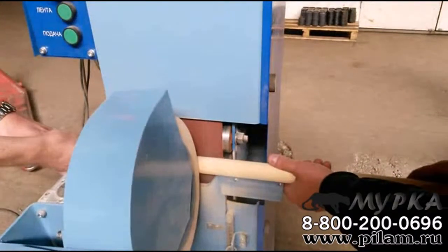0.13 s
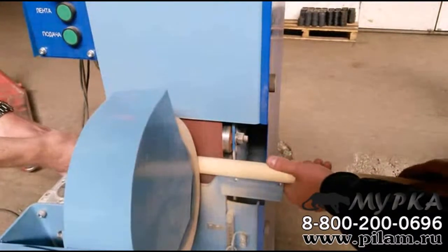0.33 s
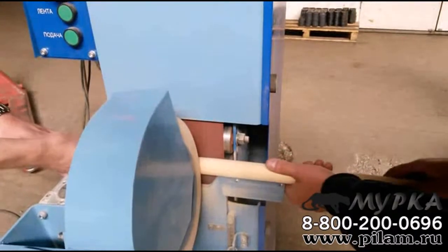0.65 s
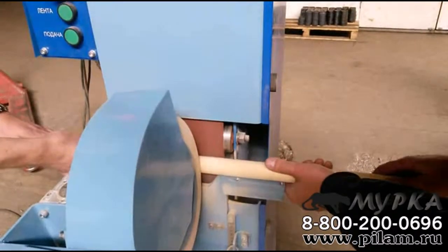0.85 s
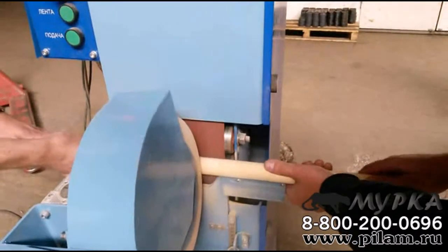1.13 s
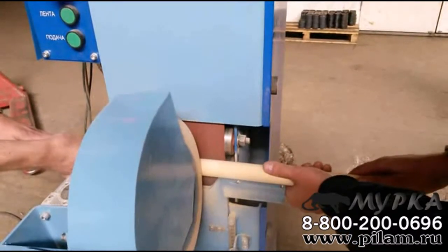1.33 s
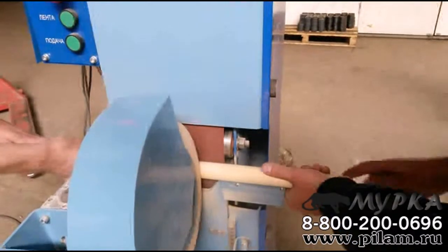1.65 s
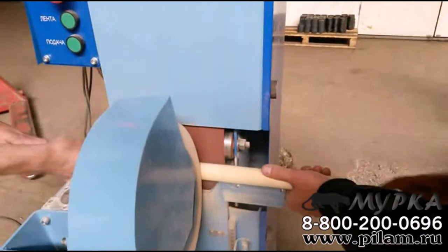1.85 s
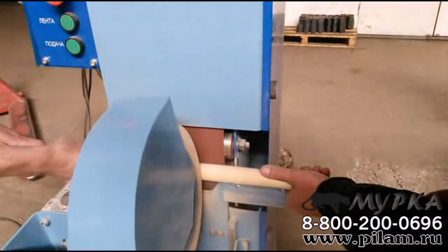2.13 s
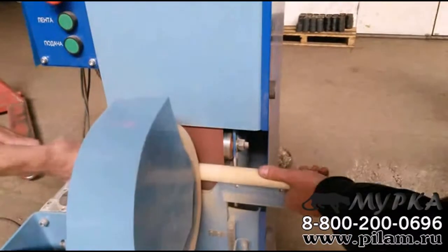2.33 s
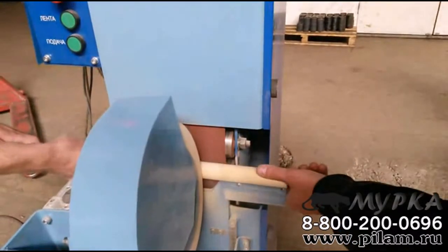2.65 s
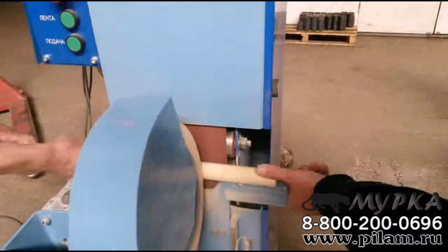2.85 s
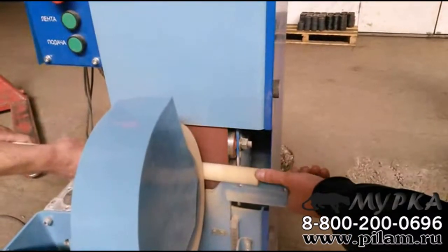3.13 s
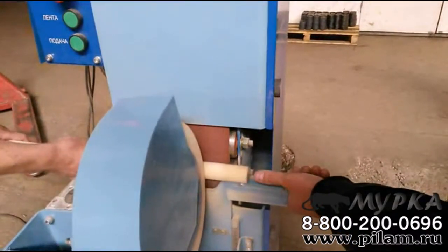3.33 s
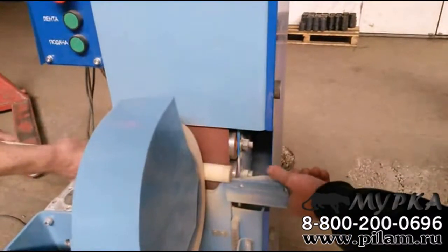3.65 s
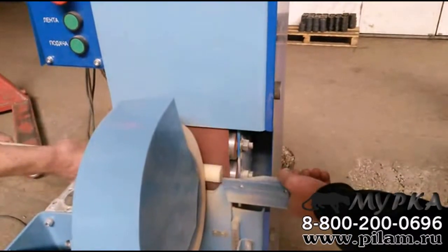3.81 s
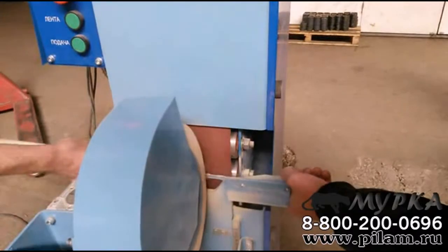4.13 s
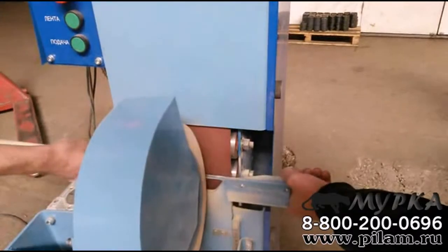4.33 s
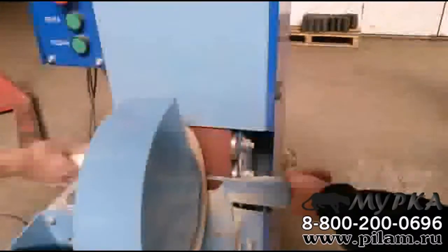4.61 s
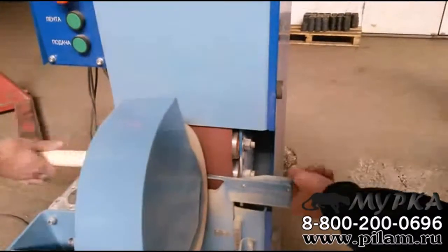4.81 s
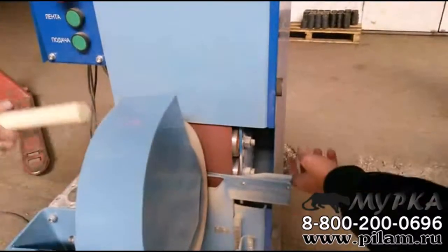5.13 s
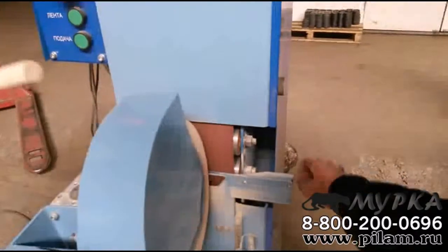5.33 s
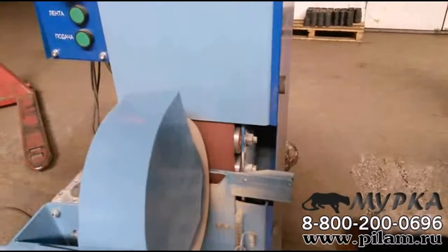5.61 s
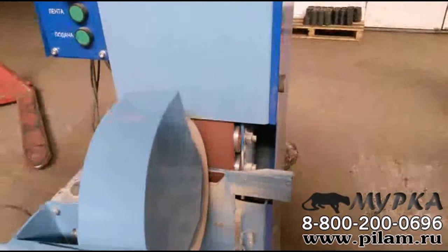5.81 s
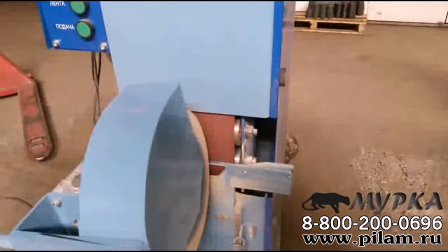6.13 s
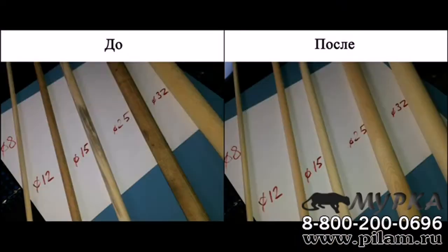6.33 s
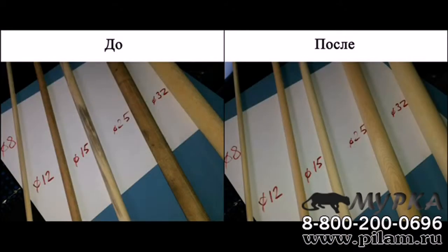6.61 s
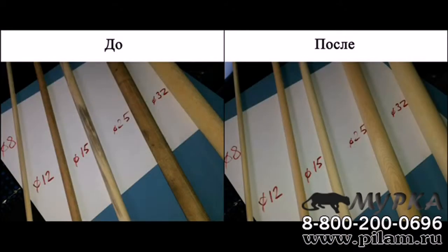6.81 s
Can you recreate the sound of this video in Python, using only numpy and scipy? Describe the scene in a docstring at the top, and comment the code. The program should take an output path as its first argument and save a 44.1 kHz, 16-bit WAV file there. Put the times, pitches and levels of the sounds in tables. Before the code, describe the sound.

Loud bright sanding hiss flutters about ten times a second, fades as the stick runs out, leaving swelling whir, drones and sinking whine, then sudden silence.

```python
"""A harsh hiss pulses quickly, loudest on the right, then gives way to a swelling whir and a sinking whine.
A belt sander grinds a wooden stick close to the right microphone: noise, louder on the belt's high spots.
When the stick's end runs out, the empty belt whirs and drones, and a slowing rotor whines as sine tones.
Another workshop machine hums in bursts, as sines over a dull noise. The sound is cut off abruptly."""
import sys
import numpy as np
from scipy import signal
from scipy.fft import rfft, irfft, next_fast_len
from scipy.io import wavfile
from scipy.ndimage import uniform_filter1d

SR = 44100
rng = np.random.default_rng(int(sys.argv[2]) if len(sys.argv) > 2 else 0)


def transcribe(signal):
    """Save signal, clipped to [-1, 1], as a 16-bit WAV file at the path in sys.argv[1]."""
    frames = np.atleast_2d(signal).T
    limited = np.clip(frames, -1, 1)
    pcm = np.round(limited * 32767).astype(np.int16)
    wavfile.write(sys.argv[1], SR, pcm)


N = 307368
T = np.arange(N) / SR  # the time of every sample, in seconds

# In the noise colours below, only the levels relative to each other count: loudness is set later.
# Roar of the far machine. Each row: frequency in Hz, left level in dB, right level in dB.
ROAR_COLOUR = [(30, -13.5, -12.5), (70, -4.5, -4.5), (120, -3.5, -6.5), (250, 0, 1), (380, -1, 0),
               (698, -11, -5), (1006, -28.5, -30)]
# Hum of the far machine. Each row: multiple of the base pitch, level in dB against the burst.
HUM_ORDERS = [(1, -18.5), (2, -1), (3, -7.5), (4, -22), (5, -18), (6, -12), (7, -16), (8, -18), (9, -16.5)]
# Hum bursts of the far machine. Each row: start in seconds, end in seconds, level in dB.
HUM_BURSTS = [(0.298, 0.737, -44.5), (0.787, 1.12, -41), (1.187, 1.403, -33), (1.536, 1.856, -35.5),
              (2.134, 2.7, -35), (3.05, 3.626, -35), (4.04, 4.618, -34)]
# Slowing rotor. Each row: time in seconds, whine level in dB, low hum level in dB, before left-right balance.
ROTOR_LEVELS = [(4.85, -55, -60), (5.25, -47.5, -43), (5.5, -39.5, -44), (5.7, -41.5, -51.5),
                (5.82, -59, -43), (5.95, -34.5, -41), (6.12, -32.5, -41.5), (6.2, -27.5, -45),
                (6.34, -25, -45)]
# Loudness of the empty belt's whir. Each row: time in seconds, level in dB.
WHIR_LEVEL = [(0, -32.5), (4.3, -30), (4.66, -30), (4.75, -30), (5.38, -26.5), (5.62, -23), (6.34, -20)]
# Whir of the belt. Each row: frequency in Hz, left level in dB, right level in dB.
WHIR_COLOUR = [(404, -72, -71.5), (510, -66, -63), (1100, -57, -59.5), (1460, -62, -60.5),
               (2430, -58.5, -59), (3970, -62.5, -60), (5060, -55, -58), (6240, -56, -51), (6570, -58, -54),
               (7880, -64.5, -47), (9160, -63.5, -55), (11020, -68, -60.5), (11120, -96, -86.5)]
# Rumble of the frame. Each row: frequency in Hz, left level in dB, right level in dB.
RUMBLE_COLOUR = [(25, -70, -65.5), (50, -59.5, -61.5), (88, -67, -65), (133, -58, -55.5),
                 (196.8, -52, -51.5), (240, -63, -57.5), (335, -58, -60.5), (600, -68, -66.5),
                 (803, -85, -86.5)]
# Loudest low drones of the empty machine. Each row: centre in seconds, half length in seconds,
# frequency in Hz, level in dB.
DRONES = [(5.2, 0.1, 181.6, -37), (5.44, 0.11, 142, -35), (5.599, .06, 137, -30), (5.75, 0.12, 195, -34.5),
          (5.802, .075, 143, -37.5), (5.92, 0.17, 175.6, -36), (6.056, 0.0676, 197, -32),
          (6.26, 0.09, 215, -35)]
# Chatter of the stick's end. Each row: centre in seconds, half length in seconds, frequency in Hz,
# level in dB before left-right balance.
CHATTER = [(4.039, 0.039, 1050, -36), (4.087, 0.027, 1010, -34), (4.138, .018, 972, -26),
           (4.172, 0.014, 1004, -33)]
# Loudest dull knocks from stick and frame. Each row: centre in seconds, half length in seconds,
# frequency in Hz, level in dB before left-right balance.
KNOCKS = [(.27, .015, 477, -34), (.55, .039, 481, -39), (.8, .012, 150, -38), (1.24, .01, 130, -40),
          (3.14, .025, 780, -35.5), (3.92, .0038, 108, -29)]
# Contact over one belt lap, with two high spots either side of the splice.
# Each row: share of the lap from 0 to 1, contact in dB before each layer scales it.
LAP_CONTACT = [(0, .3), (.05, -2), (.17, -2.8), (.28, 1.3), (.34, -.7), (.39, .5), (.5, -.5), (.62, -2.8),
               (.7, 1), (.79, 3.3), (.85, -.3), (.92, 3), (.97, 2.3), (1, .3)]
# Hiss of the grit. Each row: frequency in Hz, left level in dB, right level in dB.
GRIT_COLOUR = [(4180, -73, -77.5), (4950, -60.5, -58), (5990, -55.5, -52), (6770, -61, -47),
               (7200, -59, -46), (7650, -55.5, -41.5), (8380, -60, -42), (8830, -58, -45.5),
               (9570, -65, -47.5), (10580, -57.5, -49), (11060, -65, -51.5), (10710, -84, -58),
               (11530, -95.5, -61)]
# Coarser scraping, steadier than the hiss. Each row: frequency in Hz, left level in dB, right level in dB.
SCRAPE_COLOUR = [(2377, -77, -80), (2684, -66.5, -62.5), (2910, -63.5, -56.5), (3320, -57.5, -56),
                 (3586, -60, -61.5), (3950, -61, -58), (4530, -61.5, -58.5), (5180, -56.5, -57),
                 (6060, -73, -75)]
# Rasp carried by stick and frame. Each row: frequency in Hz, left level in dB, right level in dB.
RASP_COLOUR = [(30, -81.5, -72.5), (101.3, -66, -71.5), (168.7, -57.5, -49.5), (337.5, -66, -80),
               (418, -73.5, -73.5), (540, -61.5, -58.5), (648, -74.5, -80), (929, -56.5, -57.5),
               (1234, -56, -62.5), (1404, -69, -88), (2025, -60.5, -55), (2420, -73, -77.5),
               (2820, -74.5, -69.5)]
# Narrow resonances of the frame. Each row: centre in Hz, width in Hz, lift in dB before each layer scales it.
FRAME_RESONANCES = [(488, 18, 7), (516.3, 21, 9), (567, 21, 10), (786, 15, 6.5), (922, 14, 4),
                    (962, 8.4, 7), (1090, 14, 3.5), (1132, 5.8, 8), (1432, 10, 9.5), (2417, 29, 8),
                    (3470, 13, 8.5)]
# How alike the two sides of a noise are. Each row: frequency in Hz, likeness from 0 (unrelated) to 1 (same).
SIDE_LIKENESS = [(60, 0.64), (140, 0.86), (260, 0.59), (550, 0.59), (1160, 0.25), (2400, 0.14), (5000, .15),
                 (10000, .1)]

# The far machine: base pitch, and rise and fall time of a burst.
HUM_HZ, SWELL_S = 84.54, 0.11
# The rotor: start, then pitch and sinking rate of the whine and of the low hum.
ROTOR_S = 4.85
WHINE_HZ, WHINE_SAG_HZ_PER_S = 336, 39
LOW_HZ, LOW_SAG_HZ_PER_S = 59.5, 2.8
# The empty belt: rumble against the whir, and its further change while the stick presses.
RUMBLE_DB, DAMPED_DB = -11, -6
# Fainter drones: ranges of pitch, half length and level against the whir.
DRONE_HZ, DRONE_HALF_S, DRONE_DB = (109.7, 373.6), (0.05, 0.14), (-20, -15)
# Small knocks: ranges of pitch, half length and level before left-right balance.
RATTLE_HZ, RATTLE_HALF_S, RATTLE_DB = (129.9, 1217), (0.008, 0.021), (-44.5, -39)
OCTAVE_DB = -10  # the chatter's octave against the chatter
# The belt: laps a second at first, and how they slow a little near the stick's end.
LAP_HZ, SLOW_S, SLOW_HZ_PER_S = 10.185, 3.6, 0.3
LAP_DEPTH = 1.04  # strength of the lap pattern in the hiss
GRIT_DB, SCRAPE_DB, RASP_DB = -15, -29, -34  # under full pressure
# Pressure fades as the stick's end runs out; scrape and rasp follow a share of that fading.
EASE_S, EASE_DB_PER_S = 3.96, 14
SCRAPE_FOLLOWS, RASP_FOLLOWS = 0.34, 0.34
EXIT_S, LET_GO_S = 4.675, 0.036  # the stick leaves the belt; time for the grinding to fall 40 dB
LAG_S = 0.0002994  # the left microphone is farther from the belt
# The end: the cut, then a faint hiss that fades, before left-right balance.
CUT_S, TRAIL_S, TRAIL_DB, TRAIL_DB_PER_S = 6.3375, 0.07, -31, 269
TOP_HZ = 11200  # the treble starts to fall off here


def amp(db):
    """Turns dB into a gain."""
    return 10 ** (np.asarray(db) / 20)


def balance(left_db, right_db):
    """Gains that lean a sound to one side."""
    return amp([[left_db], [right_db]])


def unit(x):
    """Scales a signal to rms 1."""
    return x / np.sqrt(np.mean(x ** 2) + 1e-20)


def curves(rows):
    """Draws straight lines between the rows: one value per sample for each column after the time."""
    s, *columns = np.transpose(rows)
    return [np.interp(T, s, column) for column in columns]


def wobble(rate):
    """A random curve: straight lines between random knots, rate knots a second."""
    knots = rng.standard_normal(int(N * rate / SR) + 4)
    return np.interp(T * rate, np.arange(len(knots)), knots)


def filtered(x, response):
    """Multiplies the spectrum of x by a response to frequency."""
    m = next_fast_len(N + 8192)
    hz = np.fft.rfftfreq(m, 1 / SR)
    return irfft(rfft(x, m) * response(hz), m)[..., :N]


def patchy_noise(patchy_db, size):
    """Two noises that share random louder and softer patches in time and pitch, size bins wide."""
    z = signal.stft(rng.standard_normal((2, N)), nperseg=512)[2]
    field = rng.standard_normal(z.shape[1:])
    field = uniform_filter1d(field, size=size, axis=0)
    field = uniform_filter1d(field, size=8, axis=1)
    return signal.istft(z * amp(patchy_db * unit(field)), nperseg=512)[1][:, :N]


def rush(colour, patchy_db, ring=0, lag_s=0, size=6):
    """Patchy stereo noise, coloured on each side and by the frame's resonances; the middle has rms 1."""
    pair = patchy_noise(patchy_db, size)
    m = next_fast_len(N + 8192)
    hz = np.fft.rfftfreq(m, 1 / SR)
    # a small turn makes the sides alike, a large one makes them differ
    turn = np.arccos(np.clip(np.interp(hz, *np.transpose(SIDE_LIKENESS)), -1, 1)) / 2
    mid, side = rfft(pair, m) * [np.cos(turn), np.sin(turn)]
    lift_db = ring * sum(db / (1 + (2 * (hz - c) / w) ** 2) for c, w, db in FRAME_RESONANCES)
    f, left_db, right_db = np.transpose(colour)

    def gain(side_db):
        level_db = np.interp(np.log(hz + 1), np.log(f), side_db, left=-120, right=-120)
        return amp(level_db + lift_db)

    delay = np.exp(-2j * np.pi * hz * lag_s)
    left = (mid + side) * gain(left_db) * delay
    right = (mid - side) * gain(right_db)
    out = irfft(np.array([left, right]), m)[:, :N]
    return out / np.std(out.mean(axis=0))


def turns(hz, waver_hz):
    """The phase of a tone whose pitch wavers a little."""
    return 2 * np.pi * np.cumsum(hz + waver_hz * wobble(12)) / SR


def tone(phase):
    """A sine of rms 1 with a random start."""
    return np.sqrt(2) * np.sin(phase + rng.uniform(0, 2 * np.pi))


def blips(rows, waver_hz):
    """Tones that swell and fade like a bell curve, each around its centre."""
    s, half, hz, db = np.transpose(rows)[:, :, None]
    reach = int(3 * half.max() * SR)
    steps = np.arange(-reach, reach)
    t = steps / SR
    at = np.clip((s * SR).astype(int) + steps, 0, N - 1)
    phase = 2 * np.pi * hz * t + turns(0, waver_hz)[at]
    bell = np.exp(-(t / half) ** 2)
    wave = np.sqrt(2) * amp(db) * bell * np.cos(phase - phase[:, [reach]])
    return np.bincount(at.ravel(), wave.ravel(), N)  # adds overlapping tones together


def scattered(span_s, half_s, hz, db, count):
    """Random rows for blips inside the given ranges, with pitch spread on a log scale."""
    low, high = np.transpose([span_s, half_s, np.log(hz), db])
    rows = rng.uniform(size=(count, 4)) * (high - low) + low
    rows[:, 2] = np.exp(rows[:, 2])
    return rows


def far_machine():
    """Each burst of load brings up the hum's orders, each wavering in level by itself, and a dull roar."""
    load = sum(amp(db) * np.clip(np.minimum(T - start, end - T) / SWELL_S, 0, 1)
               for start, end, db in HUM_BURSTS)
    shaft = turns(HUM_HZ, waver_hz=0.5)
    hum = sum(amp(db + 1.2 * wobble(14)) * tone(k * shaft) for k, db in HUM_ORDERS)
    roar = amp(-5) * rush(ROAR_COLOUR, patchy_db=4.5, size=1)
    return load * (hum * balance(-0.7, 0.7) + roar)


def rotor():
    """A whine that sinks as the rotor slows, over a low hum that sinks too."""
    whine_db, hum_db = curves(ROTOR_LEVELS)
    since = T - ROTOR_S
    whine_phase = turns(WHINE_HZ - WHINE_SAG_HZ_PER_S * since, waver_hz=1.8)
    hum_phase = turns(LOW_HZ - LOW_SAG_HZ_PER_S * since, waver_hz=0.8)
    whine = amp(whine_db + 2.4 * wobble(15)) * tone(whine_phase)
    hum = amp(hum_db + 2.5 * wobble(11)) * tone(hum_phase)
    return (since > 0) * (whine + hum) * balance(-0.8, 0.8)


def idling():
    """The belt whirs over its rollers and the frame rumbles; once the belt is empty, drones join in."""
    whir_db, = curves(WHIR_LEVEL)
    whir = rush(WHIR_COLOUR, patchy_db=1.45, ring=1.0, lag_s=LAG_S / 2, size=3)
    whir = amp(whir_db + 0.7 * wobble(60)) * whir
    rumble_db = whir_db + RUMBLE_DB + DAMPED_DB * (T < EXIT_S)
    rumble = amp(rumble_db + 0.91 * wobble(11)) * rush(RUMBLE_COLOUR, patchy_db=0.5, size=1)
    faint_rows = scattered((EXIT_S, CUT_S), DRONE_HALF_S, DRONE_HZ, DRONE_DB, count=12)
    faint = amp(whir_db) * blips(faint_rows, waver_hz=4)
    return whir + rumble + blips(DRONES, waver_hz=2.3) + faint


def knocks():
    """Short tones: the chatter with its octave, the loudest knocks, and a rattle while the stick is fed."""
    octave = [(s, half, 2 * hz, db + OCTAVE_DB) for s, half, hz, db in CHATTER]
    chatter = blips(CHATTER + octave, waver_hz=11)
    rattle = scattered((0, EXIT_S), RATTLE_HALF_S, RATTLE_HZ, RATTLE_DB, count=95)
    dull = blips(np.vstack([KNOCKS, rattle]), waver_hz=4.3)
    return chatter * balance(1.5, -1.5) + dull * balance(-0.8, 0.8)


def grinding():
    """Grit tears at the wood harder on the belt's high spots; stick and frame carry a lower, lumpy rasp."""
    ease_db = -EASE_DB_PER_S * np.clip(T - EASE_S, 0, None)
    laps = T * LAP_HZ - SLOW_HZ_PER_S / 2 * np.clip(T - SLOW_S, 0, None) ** 2
    contact_db = LAP_DEPTH * np.interp(laps % 1, *np.transpose(LAP_CONTACT))
    touching = amp(-40 * np.clip((T - EXIT_S) / LET_GO_S, 0, 1))

    grit_db = GRIT_DB + ease_db + contact_db + 0.8 * wobble(70) + 0.31 * wobble(5.3)
    grit = amp(grit_db) * rush(GRIT_COLOUR, patchy_db=1.04, lag_s=LAG_S)

    scrape_db = SCRAPE_DB + SCRAPE_FOLLOWS * ease_db + 0.24 * contact_db + 0.36 * wobble(7.1)
    scrape = amp(scrape_db) * rush(SCRAPE_COLOUR, patchy_db=2.0, ring=1.0, lag_s=LAG_S, size=3)

    rasp_db = RASP_DB + RASP_FOLLOWS * ease_db + 1.0 * wobble(12)
    rasp = amp(rasp_db) * rush(RASP_COLOUR, patchy_db=4.5, ring=0.94, lag_s=LAG_S / 3, size=1)
    return touching * (grit + scrape + rasp)


def scene():
    """All sources together, from the background to the sander."""
    return far_machine() + rotor() + idling() + knocks() + grinding()


def record(dry):
    """Cuts the sound, lets a faint hiss trail off, rounds peaks near full scale and removes the top treble."""
    hiss = rng.standard_normal((2, N)) * balance(-2.5, 0)
    trail = amp(TRAIL_DB - TRAIL_DB_PER_S * np.abs(T - CUT_S)) * hiss * (T < CUT_S + TRAIL_S)
    x = np.where(T < CUT_S, dry, trail)
    x = x / (1 + np.abs(x / 0.93) ** 6) ** (1 / 6)  # bends peaks so they stay below 0.93

    def treble_limit(hz):
        slope_db = -np.clip((hz - TOP_HZ) / 6, 0, 80)  # 1 dB down every 6 Hz
        return amp(slope_db) * (hz < TOP_HZ + 480)

    x = filtered(x, treble_limit)
    return x * (T < 6.44)  # silence from here on


dry = scene()
out = record(dry)
transcribe(out)
```